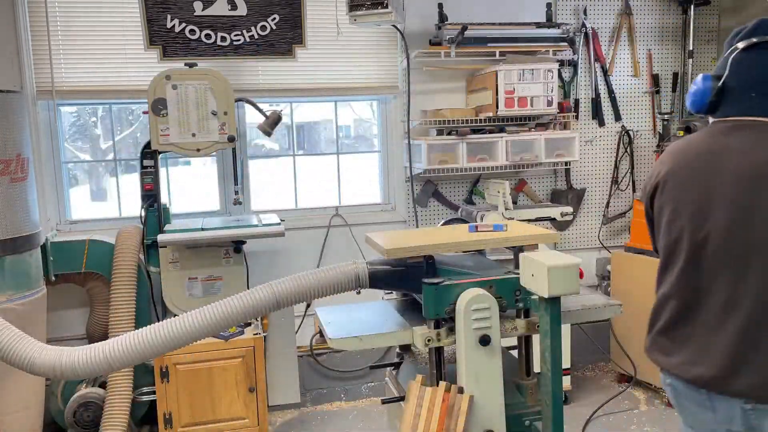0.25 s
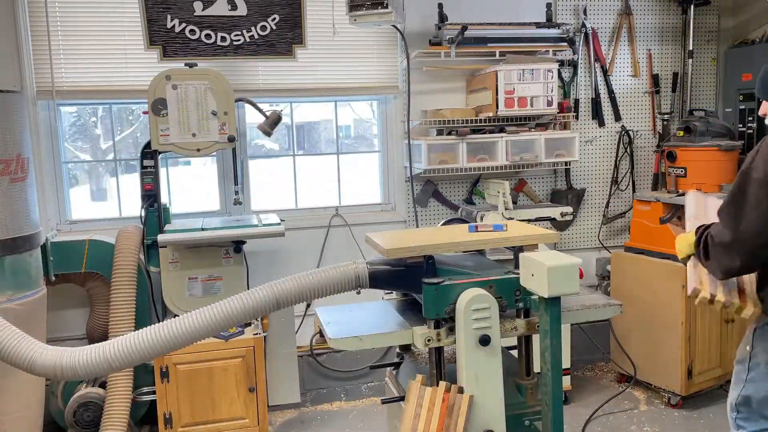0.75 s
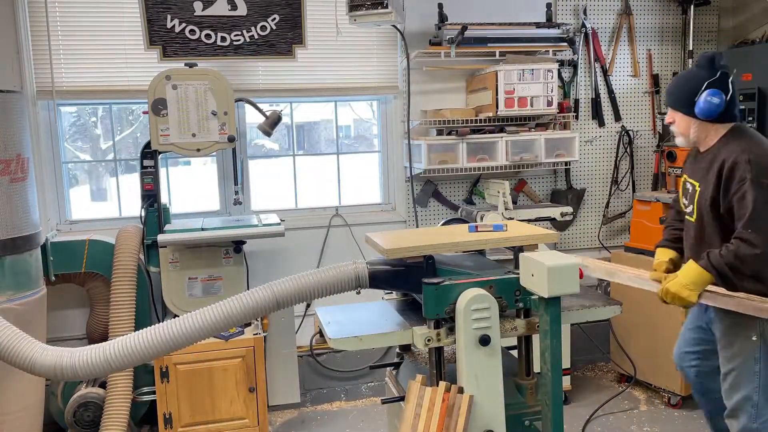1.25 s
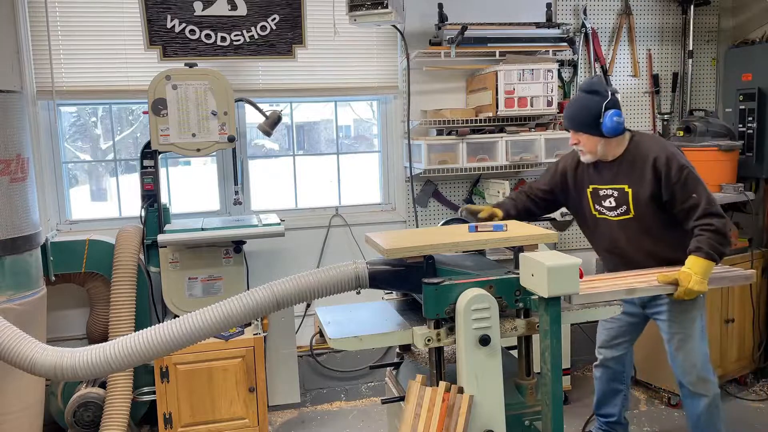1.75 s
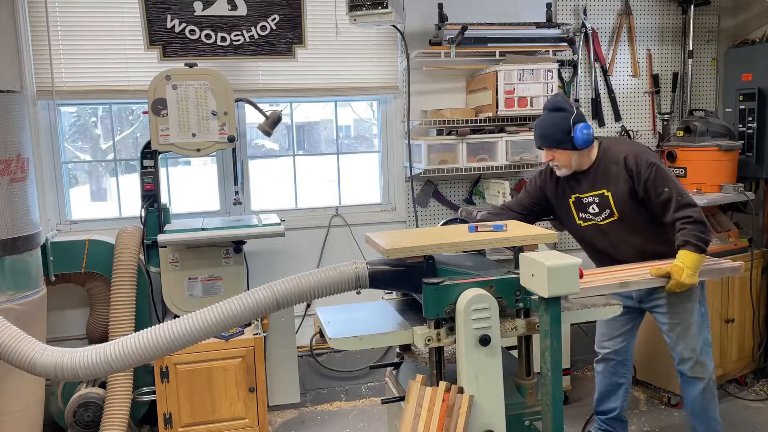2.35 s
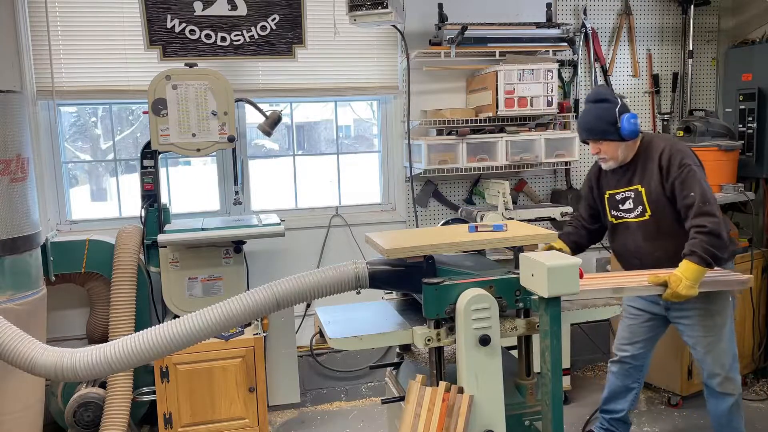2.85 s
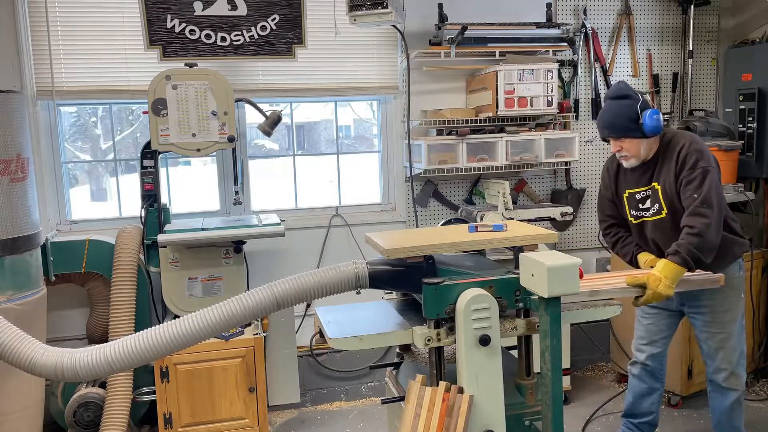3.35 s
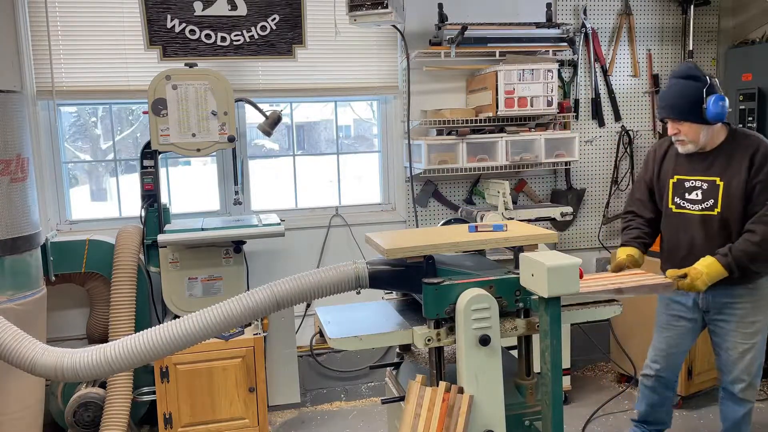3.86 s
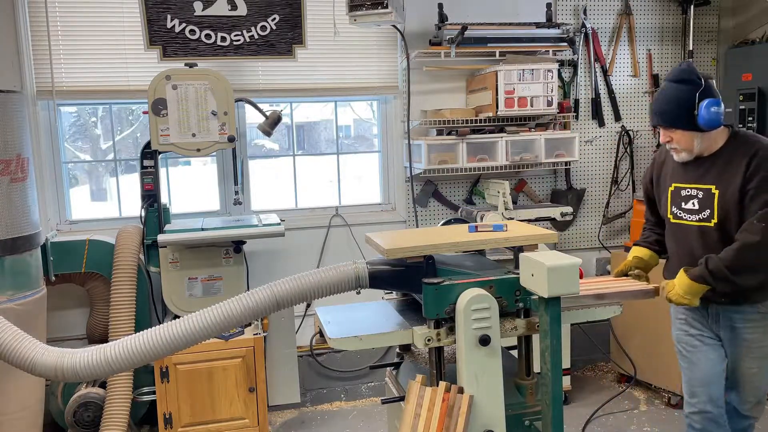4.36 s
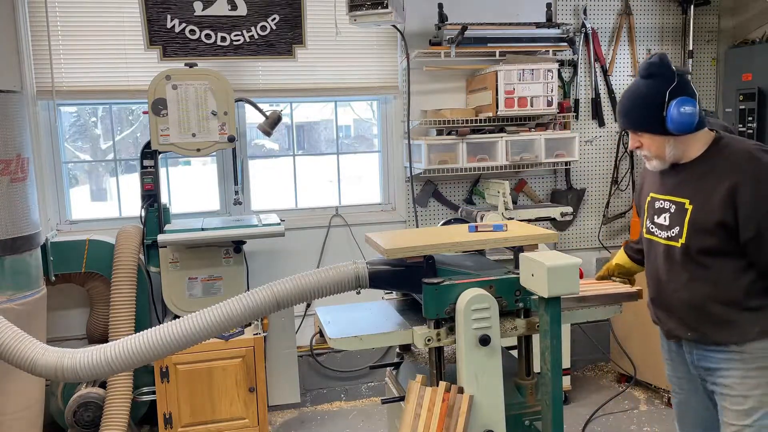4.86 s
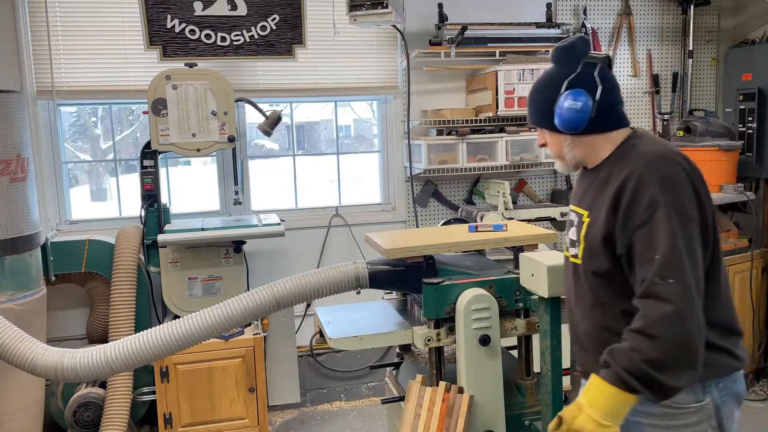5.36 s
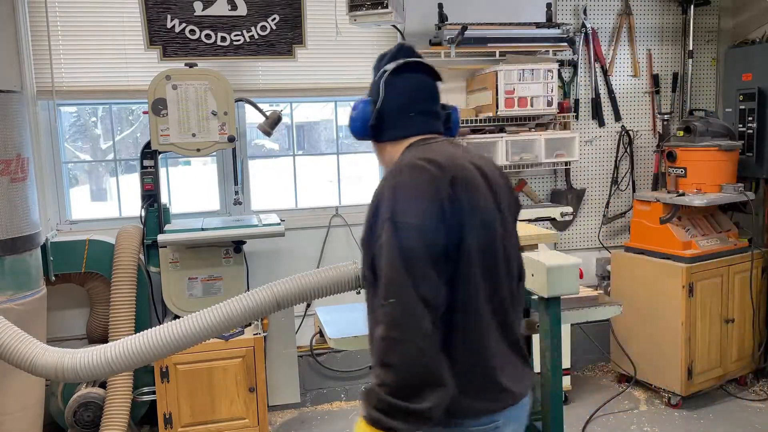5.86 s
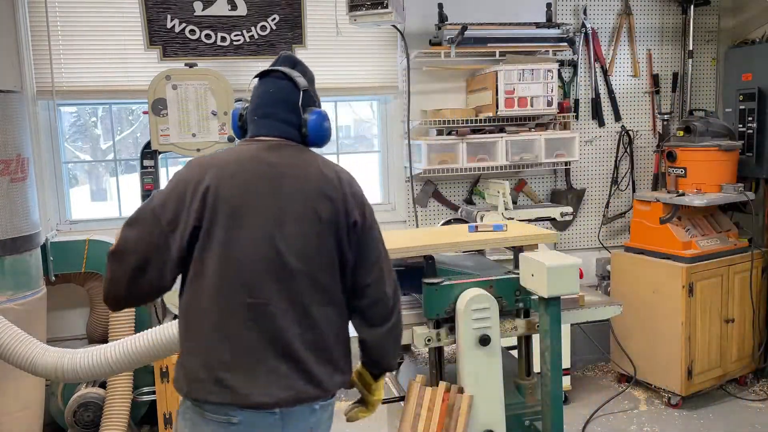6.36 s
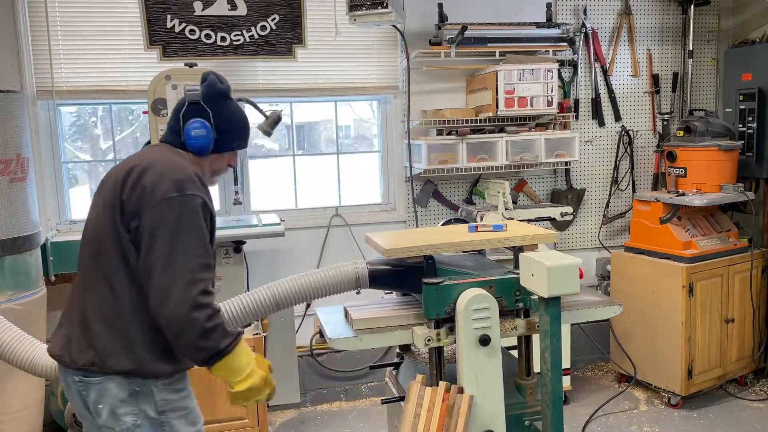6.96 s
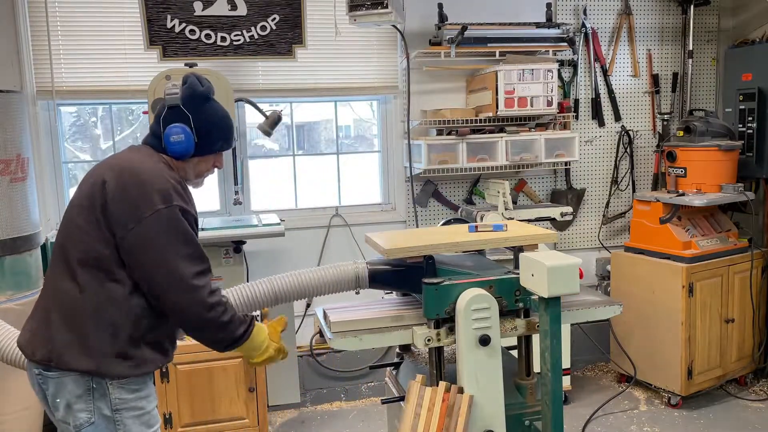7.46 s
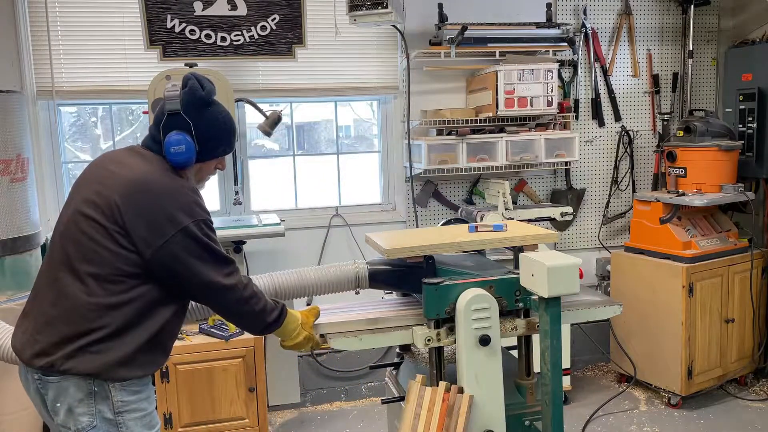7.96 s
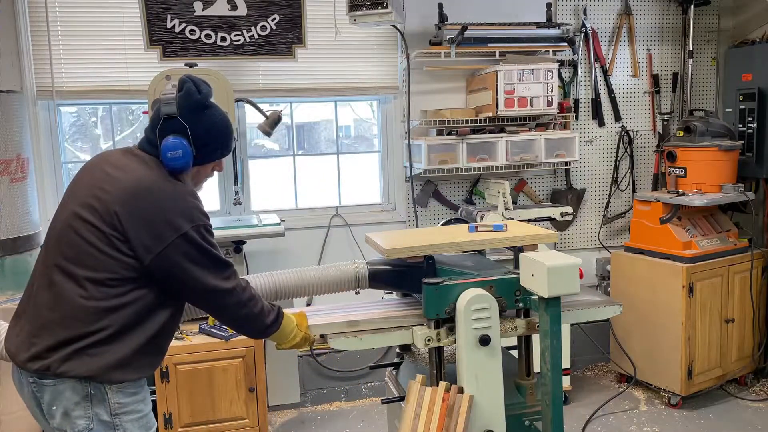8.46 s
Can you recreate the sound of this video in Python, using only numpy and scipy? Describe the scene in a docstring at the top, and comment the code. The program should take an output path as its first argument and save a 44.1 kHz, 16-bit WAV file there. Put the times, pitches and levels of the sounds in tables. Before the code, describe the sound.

From the start, a dust collector roars continuously, a low, resonant rush of air with shaft hum, a steady two-toned blade whine and faint airy suction hiss. Beside it a planer idles with a low hum and thin whistle. At about 1.6 seconds a wooden panel knocks on the table, ringing briefly. Around 3.7 it scuffs across steel, then knocks more softly near 4.0 as the whistle rises. At 4.4 the knives bite suddenly: a harsh, dense buzz with fast pulsing hiss, while the idle whistle drops away. Howls and notes from the wood swell and fade unevenly from 4.8 to 7.7, the pitch sagging slightly; a tiny scuff comes near 7.2. The cut brightens after 7.5, and a piercing howl peaks around 8.2 before easing. It ends at 8.7 still cutting. Wide stereo, heard from across a reflective workshop.

```python
"""A thickness planer idles beside a roaring dust collector whose fan whines: coloured noise and tones.
A wooden panel is set down with a knock, scuffs the steel and knocks again: decaying modes and noise.
Then the knives bite: stroke harmonics and pulsing hiss, with a harmonic howl and notes from the panel.
The panel scuffs once more during the cut.
Heard in stereo from across the room, the treble partly in opposite phase."""
import sys
import numpy as np
from scipy import signal
from scipy.fft import rfft, irfft, next_fast_len
from scipy.io import wavfile
from scipy.ndimage import uniform_filter1d

SR = 44100
rng = np.random.default_rng(int(sys.argv[2]) if len(sys.argv) > 2 else 0)


def persist_wave(psi):
    """Save psi, clipped to +-1, as 16-bit WAV."""
    counts = np.round(np.clip(psi, -1, 1) * 32767).astype(np.int16)
    wavfile.write(sys.argv[1], SR, np.atleast_2d(counts).T)


N = 384111
TIME_S = np.arange(N) / SR
ROOM_LAG_TURNS = np.array([[0], [.25]])  # rows: direct, room


def gain_of(db):
    """Decibels to gain."""
    return 10 ** (np.asarray(db) / 20)


def evened(x):
    """Scales to rms 1."""
    return x / np.sqrt(np.mean(x ** 2) + 1e-20)


def read(points, hz):
    """Reads a spectrum on a log-frequency axis."""
    point_hz, value = np.transpose(points)
    return np.interp(np.log(hz + 1), np.log(point_hz + 1), value)


def curves(rows):
    """Columns of a table against time, one value per sample."""
    row_s, *columns = np.transpose(rows)
    return [np.interp(TIME_S, row_s, column) for column in columns]


def drift(rate_hz, count=2):
    """Slow smooth chance of rms about 1: random knots, rate_hz a second, joined by cosine fades."""
    knots, step = rng.standard_normal((count, 400)), 64
    at = np.minimum(np.arange(N // step + 1) * step / SR * rate_hz, 398)
    k = at.astype(int)
    u = .5 - .5 * np.cos(np.pi * (at - k))
    slow = knots[:, k] * (1 - u) + knots[:, k + 1] * u
    slow /= np.sqrt(u ** 2 + (1 - u) ** 2)  # same spread between knots as on them
    return uniform_filter1d(np.repeat(slow, step, axis=1), step, axis=1)[:, :N]


def noise(colour_db):
    """Two unrelated noises (direct, room) of one colour; shop reflections comb it into uneven ridges."""
    size = next_fast_len(N)
    hz = np.fft.rfftfreq(size, 1 / SR)
    ridges = np.interp(hz, np.arange(800) * 28., rng.standard_normal(800))
    ridges *= np.clip(hz / 700 - 1, 0, 1)
    white = rfft(rng.standard_normal((2, size)), axis=1)
    coloured = white * gain_of(colour_db(hz) + 2.4 * ridges)
    return evened(irfft(coloured, size, axis=1)[:, :N])


def tone(turns, waver_db, blur_turns, rate_hz):
    """Sine of wandering level and phase; the room's copy is a quarter turn off and wanders on its own."""
    phase_turns = turns + rng.random() + ROOM_LAG_TURNS + blur_turns * drift(rate_hz)
    level = np.sqrt(2) * gain_of(waver_db * drift(rate_hz))
    return level * np.sin(2 * np.pi * phase_turns)


# Knife strokes, sagging under load. Each row: time in seconds, stroke rate in Hz.
STROKE_RATE = [(0, 170), (4.44, 170), (4.6, 169.2), (5.2, 169.35), (6, 169.35), (6.6, 168.95),
               (7.3, 169.05), (7.8, 168.65), (8.3, 168.4), (8.71, 168.3)]
# How hard the knives cut, heard as the shearing hiss. Each row: time in seconds, level in dB.
CUT_LEVEL = [(4.44, -46), (4.53, -47), (4.68, -49), (5.5, -51.5), (5.72, -51), (5.83, -54), (6.12, -52),
             (6.98, -49), (7.45, -47.5), (7.8, -45), (8.5, -44.5), (8.64, -47.5), (8.71, -44.5)]


def planer():
    """At the bite the knives, locked to one stroke rate, add hum, song and hiss; the idle tones drop."""
    turns = np.cumsum(curves(STROKE_RATE)[0]) / SR
    cut_db = curves(CUT_LEVEL)[0]
    bite = np.clip((TIME_S - CUT_LEVEL[0][0]) / 0.025, 0, 1)  # 25 ms ramp
    cutting = stroke_hum(turns, cut_db) + panel(turns, cut_db) + shear_hiss(turns, cut_db)
    return bite * cutting + idling_head(turns) * gain_of(-2.5 * bite)


# Stroke harmonics; unequal knives add half steps.
# Each row: multiple of the stroke rate, level in dB relative within the stack.
STROKE_HARMONICS = [(7, 3.5), (7.5, -11), (8, 4), (8.5, -14), (9.5, 4), (10, -1), (10.5, -5), (12, -1),
                    (12.5, -7), (14, 3.5), (14.5, -2), (16, -1), (17.5, -9), (18.5, -14), (21, -16),
                    (23.5, -5), (24, -2.5), (25, -30), (26, -7), (27, -21), (28, -8), (30, -6), (32, -11.5),
                    (34, -31), (35, -6.5), (36, -27), (37, -30), (40, -4), (42, -10.5), (44, -6), (46, -20),
                    (48, -21), (53, -17), (55, -29), (57, -20), (64, -16.5)]


def stroke_hum(turns, cut_db, hum_over_hiss_db=1):
    """Knife strokes sound harmonics that swell and fade as the panel moves."""
    stack = np.zeros((2, N))
    for multiple, db in STROKE_HARMONICS:
        swell = gain_of(db + 3.5 * drift(7., count=1))
        shiver_turns = 0.018 * drift(30., count=1)  # the wood yields unevenly
        phase_turns = multiple * turns + rng.random() + ROOM_LAG_TURNS + shiver_turns
        stack += swell * np.sin(2 * np.pi * phase_turns)
    return gain_of(cut_db + hum_over_hiss_db) * evened(stack)


# 11th stroke harmonic, the panel's loudest voice. Each row: time in seconds, level in dB.
HOWL_LEVEL = [(4.44, -73), (4.47, -54), (4.81, -54), (4.83, -46.5), (5.3, -41), (5.34, -55), (5.53, -44.5),
              (5.95, -46), (5.97, -52), (6.27, -43), (6.32, -53), (6.39, -40.5), (6.65, -52), (7.38, -43),
              (7.45, -52), (7.65, -38.5), (7.71, -42), (8.22, -28.5), (8.42, -32), (8.71, -53)]
# Harmonics the panel favours. Each row: multiple of the stroke rate, mean level in dB against the hiss.
MURMURS = [(9, -9), (13, -9), (15, -16), (17, -9.5), (18, -11.5), (20, -10), (22, -8.5), (29, -25),
           (31, -12.5), (33, -21)]
# A resonance of the moving panel meets one harmonic.
# Each row: start in seconds, length in seconds, multiple of the stroke rate, level in dB.
PANEL_NOTES = [(4.446, 0.12, 22, -47), (4.46, 0.2, 33, -50), (4.463, 0.29, 18, -48), (4.48, 0.18, 24, -61),
               (4.528, .11, 13, -47), (4.65, .13, 35, -58), (4.92, 0.44, 31, -61), (5.04, .22, 22, -57),
               (5.05, 0.4, 20, -51), (5.123, 0.21, 13, -47), (5.27, .24, 24, -56), (5.3, 0.28, 22, -50.5),
               (5.374, 0.38, 9, -45.5), (5.66, 0.37, 13, -51), (5.677, 0.33, 22, -56),
               (5.55, 0.24, 33, -58), (5.66, .14, 24, -55), (5.888, 0.42, 20, -51.5),
               (6.007, 0.55, 13, -48), (6.05, .2, 22, -55), (6.25, 0.25, 24, -60), (6.5, 0.31, 20, -58),
               (6.85, 0.78, 18, -53), (6.95, 0.86, 17, -50), (7.06, 1.06, 15, -47.5), (7.2, 0.26, 33, -58),
               (7.4, .26, 24, -62), (7.4, 1.4, 8, -50), (7.4, 1.4, 7, -56), (7.42, 0.6, 13, -60),
               (7.473, 0.73, 22, -44.5), (7.52, 0.43, 31, -60), (7.62, 0.68, 9, -49), (7.85, 0.39, 22, -51),
               (7.87, 0.6, 20, -49), (7.955, 0.34, 29, -51.5), (7.97, 0.82, 35, -61), (7.97, .23, 27, -61),
               (8.0, 1.3, 31, -53), (8.12, .42, 24, -59), (8.15, .45, 14, -46), (8.2, 0.76, 15, -41),
               (8.25, .42, 16, -50), (8.27, 0.32, 22, -44), (8.3, 0.66, 13, -38), (8.31, .36, 9, -59),
               (8.35, 0.23, 18, -55), (8.375, 0.33, 29, -54), (8.612, .15, 15, -39)]


def panel(turns, cut_db, rise_share=0.12, fall_share=0.45):
    """Favoured harmonics murmur with the cut, resonances swell into notes, the eleventh howls."""
    power = {11: gain_of(2 * curves(HOWL_LEVEL)[0])}
    for multiple, db in MURMURS:
        murmur_db = cut_db + db + 3.1 * drift(6., count=1)[0]
        power[round(multiple)] = gain_of(2 * murmur_db)
    for start_s, length_s, multiple, db in PANEL_NOTES:
        k = round(multiple)
        u = (TIME_S - start_s) / length_s
        shape = np.clip(np.minimum(u / rise_share, (1 - u) / fall_share), 0, 1)
        power[k] = power.get(k, 0) + (gain_of(db) * shape) ** 2
    return sum(np.sqrt(p) * tone(k * turns, waver_db=.9, blur_turns=.02, rate_hz=25.)
               for k, p in power.items())


# Hiss of sheared wood. Each row: frequency in Hz, relative density in dB per Hz.
SHEAR_COLOUR = [(700, -25), (1500, -17), (2500, -3.5), (4000, -2.5), (6000, -6.5), (8000, -5.5),
                (11000, -11.5), (15700, -15)]


def shear_hiss(turns, cut_db):
    """Shearing hisses and pulses at once and twice the stroke rate."""
    pulse = 1 + 0.18 * np.cos(4 * np.pi * turns) + 0.055 * np.cos(2 * np.pi * turns)
    level = gain_of(cut_db + 1.1 * drift(30.0, count=1))
    return noise(lambda hz: read(SHEAR_COLOUR, hz)) * pulse * level


# Panel on the table. Each row: mode in Hz, level in dB against the knock, 60 dB decay time in seconds.
WOOD_MODES = [(738, -4, 0.51), (400, 3.5, 0.086), (1200, -7, 0.051), (850, -8, .08)]
# Each row: start in seconds, level in dB.
KNOCK_TIMES = [(1.58, -33.5), (3.96, -40)]


def knocks():
    """The panel knocks on the table and its modes ring down."""
    out = np.zeros((2, N))
    for start_s, db in KNOCK_TIMES:
        after_s = np.maximum(TIME_S - start_s, 0)
        for mode_hz, mode_db, t60_s in WOOD_MODES:
            decay = gain_of(db + mode_db - 60 * after_s / t60_s)
            out += decay * np.sin(2 * np.pi * mode_hz * after_s)
    return out


# Wood slides on steel. Each row: start in seconds, time scale in seconds, level in dB before the envelope.
SCUFF_TIMES = [(3.66, 0.11, -44.5), (7.242, .05, -44)]
# Each row: frequency in Hz, relative density in dB per Hz.
SCUFF_COLOUR = [(3000, -15), (5200, 3), (5900, 0), (6150, 12), (6450, 1), (7500, 3), (9000, -4), (10500, 1),
                (12000, -8), (15700, -9)]


def scuffs():
    """Rubbing noise swells, then dies away exponentially."""
    rub, out = noise(lambda hz: read(SCUFF_COLOUR, hz)), np.zeros((2, N))
    for start_s, scale_s, db in SCUFF_TIMES:
        u = np.maximum(TIME_S - start_s, 0) / scale_s
        out += gain_of(db) * rub * 4 * u * np.exp(-3 * u)
    return out


# The spinning head alone. Each row: multiple of the stroke rate, level in dB before the bite.
IDLE_TONES = [(.5, -48), (2, -63), (4, -53.5)]
# 14th idle harmonic, louder as the panel nears the head.
# Each row: time in seconds, level in dB before the drop at the bite.
WHISTLE_LEVEL = [(0, -61.5), (3.3, -61), (3.8, -57), (4.4, -50), (4.55, -81), (8.71, -61)]


def idling_head(turns):
    """The spinning head hums and whistles at multiples of the stroke rate."""
    whistle = tone(14 * turns, waver_db=1.0, blur_turns=0.049, rate_hz=20.)
    out = gain_of(curves(WHISTLE_LEVEL)[0]) * whistle
    for multiple, db in IDLE_TONES:
        out += gain_of(db) * tone(multiple * turns, waver_db=1.5, blur_turns=0.046, rate_hz=12.)
    return out


# Air in the fan housing. Each row: frequency in Hz, relative density in dB per Hz.
ROAR_COLOUR = [(26, -47), (45, -20), (88, -5.5), (275, -5.5), (417, -6), (472, -2), (582, -4.5), (829, -14),
               (939, -11), (1110, -14), (1390, -15), (1550, -19), (2390, -22), (2660, -20.5), (6500, -33),
               (8450, -78), (14300, -120)]
# Ducts, cabinet and room. Each row: centre in Hz, width in Hz, boost at the centre in dB.
DUCT_RESONANCES = [(71, 12, -2), (89, 14.6, -27), (228, 6.7, -7), (258, 10, -0.5), (568, 57, -11),
                   (108, 21.3, 10.5), (208.8, 12.6, 9), (236.7, 8.5, 6), (278, 15, 3.5), (311.5, 11.4, 6),
                   (345, 9.8, 9.5), (375, 5.3, 7), (396, 15.2, 9), (435, 42, 3), (523, 7.6, 2.5),
                   (543.4, 16, 5), (580, 9.4, 8), (1010, 29, 7), (1214, 36, 6), (1369, 10, 7.5),
                   (1424, 7.5, 12), (1445, 74, 4.5), (1526, 40, -8.5), (1644, 46, 6), (1887, 77, 6),
                   (2328, 160, 9.5), (2855, 30, 7), (3053, 22, 6.5)]
# Each row: time in seconds, mean level in dB.
ROAR_LEVEL = [(0, -37), (5.7, -35.5), (7.3, -36), (8.44, -35), (8.71, -38.5)]


def collector_roar():
    """Turbulent air roars through resonant ducts: noise with peaks and dips."""
    def colour_db(hz):
        ducts_db = sum(db / (1 + (2 * (hz - centre_hz) / width_hz) ** 2)
                       for centre_hz, width_hz, db in DUCT_RESONANCES)
        return read(ROAR_COLOUR, hz) + ducts_db
    return noise(colour_db) * gain_of(curves(ROAR_LEVEL)[0] + .5 * drift(6.6))


# Air drawn into the hood. Each row: frequency in Hz, relative density in dB per Hz.
SUCTION_COLOUR = [(2500, -24), (5000, -31), (7000, 2), (9000, -0.5), (12000, -7.5), (15700, -8.5)]


def hood_suction(mean_db=-59.5):
    """Air drawn into the hood hisses with a slight flutter."""
    level = gain_of(mean_db + 0.39 * drift(27.0, count=1))
    return noise(lambda hz: read(SUCTION_COLOUR, hz)) * level


# Hum of the fan shaft. Each row: time in seconds, level in dB.
SHAFT_LEVEL = [(0, -49), (2.2, -48.5), (3, -45.5), (3.8, -46.5), (6, -49), (8.71, -49)]
# Whine of the blades. Each row: time in seconds, first blade tone in dB, second blade tone in dB.
BLADE_WHINE = [(0, -40, -42), (.8, -39.5, -38.5), (3.15, -39.5, -39.5), (4.87, -38.5, -37),
               (5.04, -47, -38.5), (5.34, -35.5, -39), (5.75, -48.5, -41.5), (5.94, -37, -41),
               (6.5, -41, -40), (6.75, -47, -43), (7.37, -42.5, -44), (8.71, -44.5, -49.5)]
# Weaker fan tones. Each row: multiple of the shaft speed, level in dB.
WEAK_FAN_TONES = [(2, -55), (9, -60.5), (10, -78)]


def collector_fan(shaft_hz=59.25, blades=8):
    """Shaft hum, blade whine and weaker orders, all at multiples of one shaft speed."""
    turns = shaft_hz * TIME_S
    first_db, second_db = curves(BLADE_WHINE)
    shaft = tone(turns, waver_db=-0.5, blur_turns=.005, rate_hz=16.0)
    first = tone(blades * turns, waver_db=1.0, blur_turns=0.069, rate_hz=18.)
    second = tone(2 * blades * turns, waver_db=0.96, blur_turns=0.0097, rate_hz=30.)
    out = gain_of(curves(SHAFT_LEVEL)[0]) * shaft + gain_of(first_db) * first + gain_of(second_db) * second
    for multiple, db in WEAK_FAN_TONES:
        blur_turns = 0.0043 * multiple
        out += gain_of(db) * tone(round(multiple) * turns, waver_db=7.0, blur_turns=blur_turns, rate_hz=13.0)
    return out


def scene():
    """Row 0 is the direct sound, row 1 what the room scatters."""
    return planer() + knocks() + scuffs() + collector_roar() + hood_suction() + collector_fan()


# Likeness of left and right. Each row: frequency in Hz, likeness from 0 to 1.
LIKENESS = [(60, 0.97), (130, 0.96), (290, 0.73), (640, 0.13), (1400, 0.52), (3100, 0.49), (6000, 0.53)]
# Treble likeness of left and right. Each row: frequency in Hz, likeness from 0 to 1.
TREBLE_LIKENESS = [(7300, .3), (7600, 1), (8850, 1), (9150, .3), (10200, .3), (10700, 1), (12300, 1),
                   (12600, .3), (13500, .3), (13800, 1)]
# Each row: frequency in Hz, phase between left and right in half turns, stepping in the treble.
STEREO_PHASE = [(60, 0), (6500, 0), (7580, -1), (8850, -1), (10500, -2), (12300, -2), (13750, -3),
                (16000, -3)]
# Each row: frequency in Hz, left minus right in dB.
LEFT_OVER_RIGHT = [(60, -1.5), (200, -5), (380, 5.5), (700, 1), (1300, 0.3), (2400, 0.5), (4400, 3.5)]


def record(dry, edge_hz=15750):
    """The right channel mixes phase-shifted direct sound with scattered sound; then the band limit."""
    size = next_fast_len(N)
    hz = np.fft.rfftfreq(size, 1 / SR)
    direct, room = rfft(dry, size, axis=1)
    alike = np.clip(read(LIKENESS + TREBLE_LIKENESS, hz), 0, 1)
    tilt = gain_of(read(LEFT_OVER_RIGHT + [(7400, 0.11)], hz) / 2)  # nearly level from 7400 Hz up
    shifted = direct * np.exp(-1j * np.pi * read(STEREO_PHASE, hz))
    right = alike * shifted + np.sqrt(1 - alike ** 2) * room
    stereo = irfft(np.array([direct * tilt, right / tilt]), size, axis=1)[:, :N]
    low_pass = signal.firwin(1023, edge_hz, window=("kaiser", 9), fs=SR)
    return signal.oaconvolve(stereo, low_pass[None], "same")


dry = scene()
out = record(dry)
persist_wave(out)
```